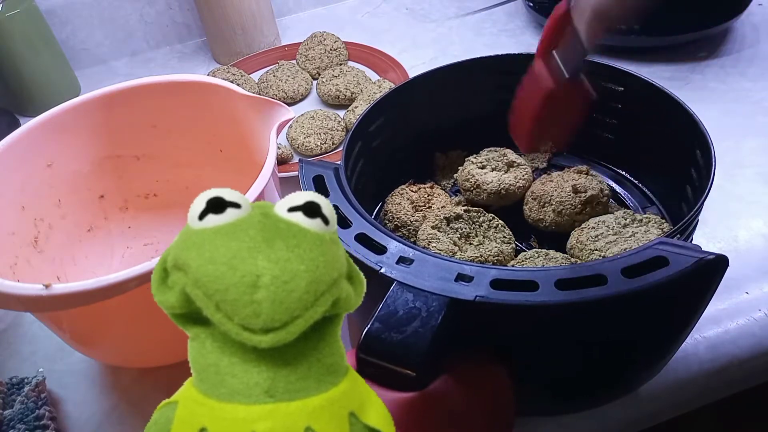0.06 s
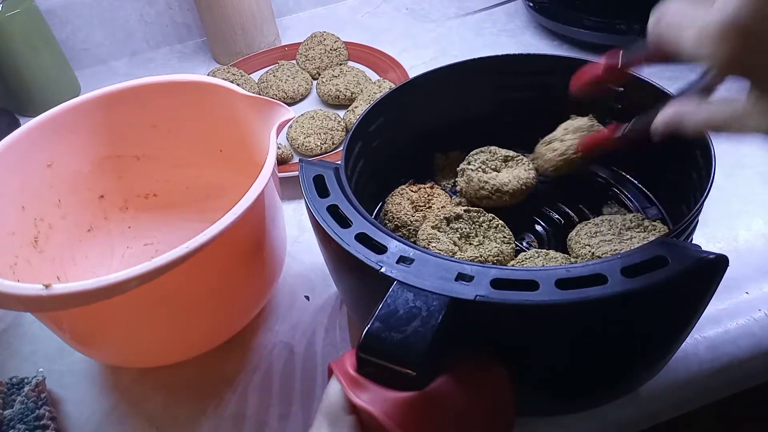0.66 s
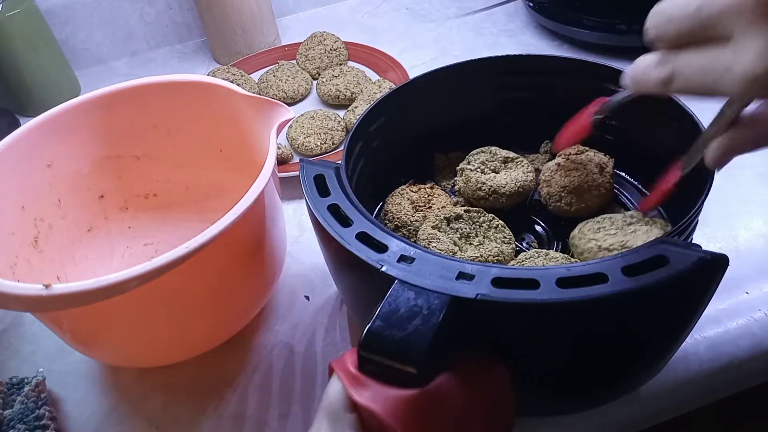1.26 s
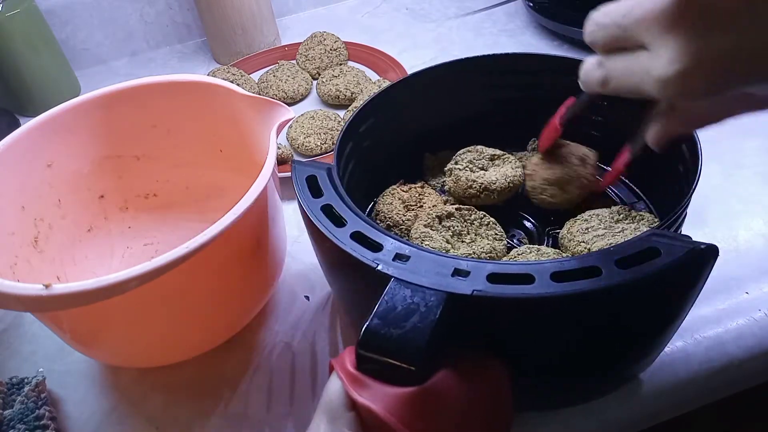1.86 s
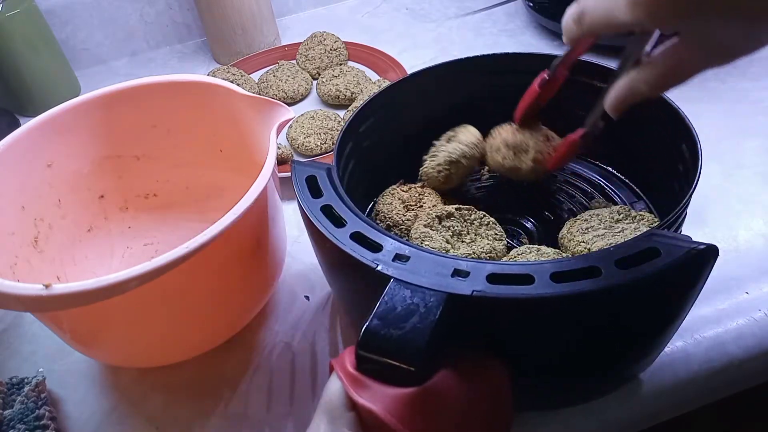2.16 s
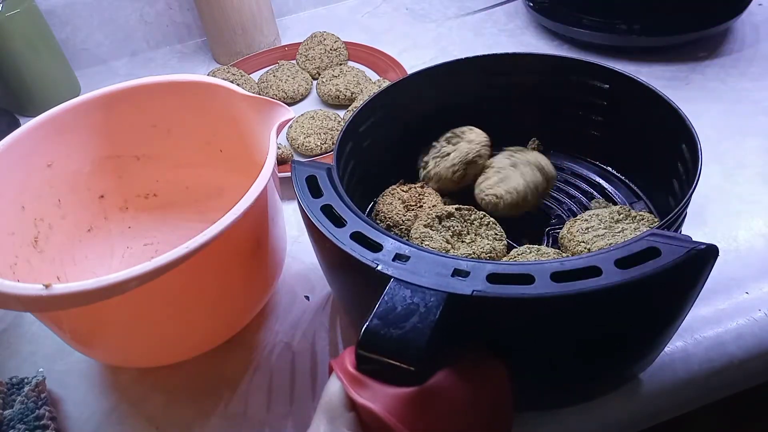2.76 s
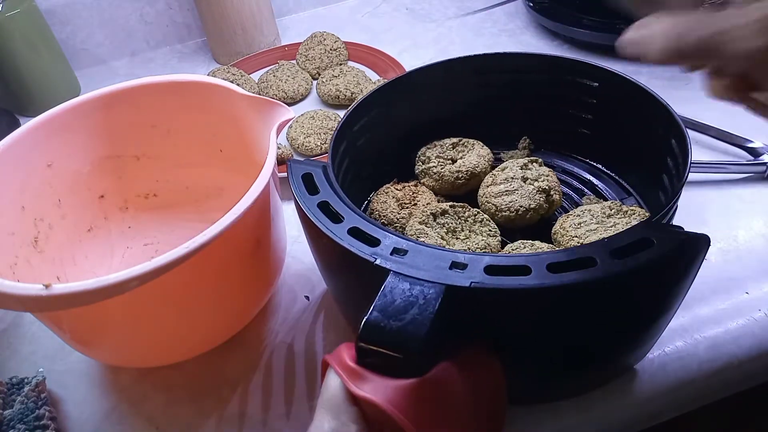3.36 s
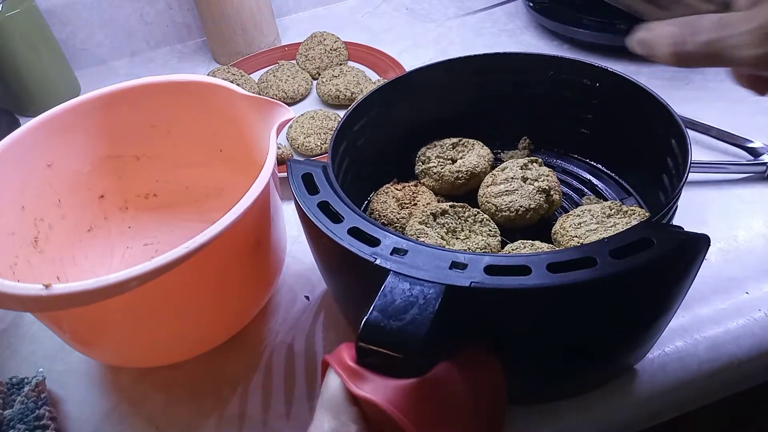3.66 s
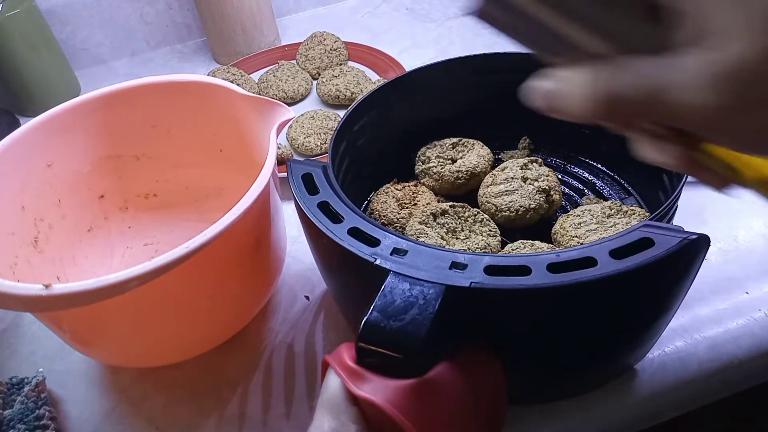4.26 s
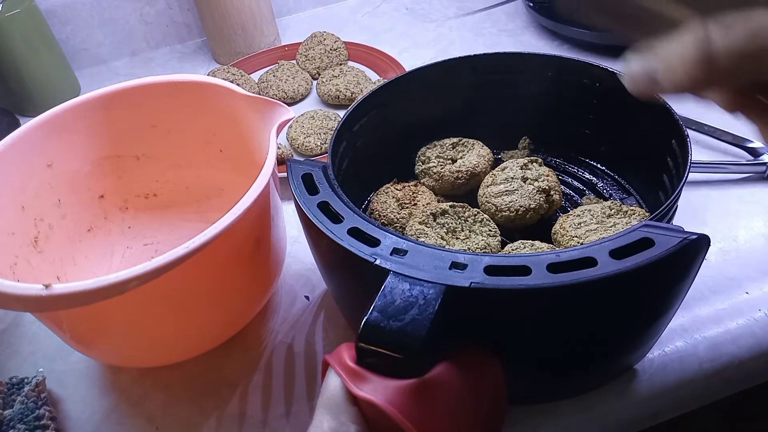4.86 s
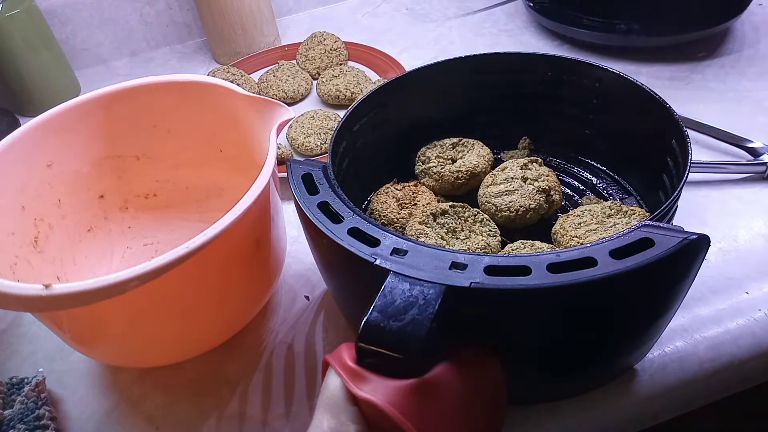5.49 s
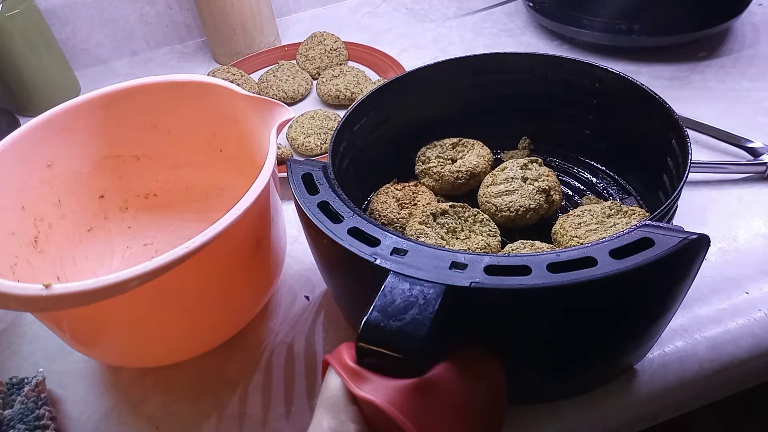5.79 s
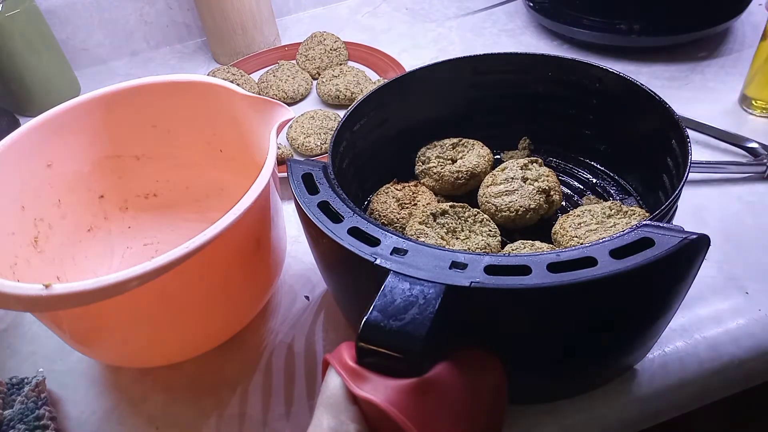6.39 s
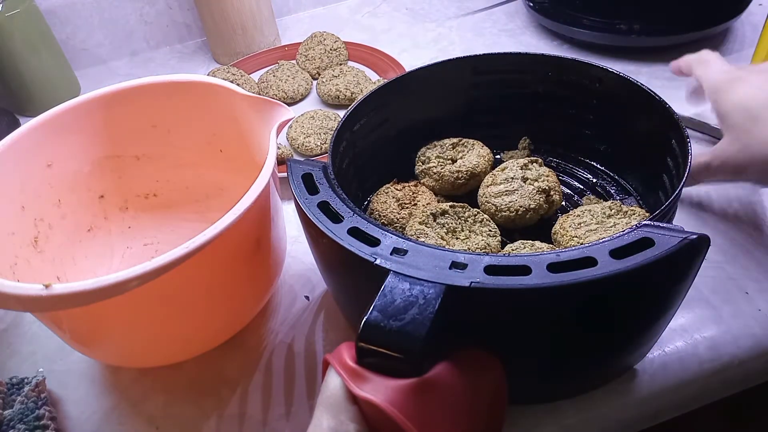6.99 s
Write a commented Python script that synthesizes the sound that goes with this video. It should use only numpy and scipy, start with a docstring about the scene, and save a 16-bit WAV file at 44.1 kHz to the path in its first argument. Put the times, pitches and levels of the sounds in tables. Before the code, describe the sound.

Faint ticks, scrapes and crunches come from patties being turned with tongs in a fryer basket, until the steel tongs clatter and bounce on the counter. Ten quick hissing squirts from a clicking oil pump follow, and the bottle lands with a loud, rattling thump. Everything is heard over a quiet room hiss, at arm's length, through a small microphone in a small kitchen.

```python
"""Light clinks and crunches over a quiet hiss: tongs turn crusty patties in an air fryer basket, then
drop on the counter, steel arms clashing. A hand pump squirts oil over the food, four strokes a second,
hissing through its nozzle, with trigger, piston and valve clicks between squirts. The bottle is set down
hard and drums the counter. A small kitchen, heard at arm's length through a small microphone."""
import sys
import numpy as np
from scipy import signal
from scipy.fft import rfft, irfft, next_fast_len
from scipy.io import wavfile

SR = 44100
rng = np.random.default_rng(int(sys.argv[2]) if len(sys.argv) > 2 else 0)


def generate_wav(sig):
    """Save sig (samples, or channels by samples) to the path in sys.argv[1] as 16-bit PCM at SR."""
    pcm = np.round(np.clip(np.atleast_2d(sig).T, -1, 1) * 32767).astype(np.int16)
    wavfile.write(sys.argv[1], SR, pcm)


N = 310023
EVENT_T = np.arange(16384) / SR  # time axis of one short sound, s

# modes of the counter top: (f/Hz, level/dB, t60/s before damping)
COUNTER_MODES = [(106.5, -11.5, 0.14), (134.4, -9, 0.17), (193, -13.5, 0.24), (223.4, -9.5, 0.29),
                 (291, -6, 0.23), (376.2, 4.5, 0.18), (450, -9, 0.29), (501, 2.5, 0.12), (641, -10.5, 0.24),
                 (714, -10.5, 0.33), (790, -8.5, 0.32), (870.5, -8, 0.34), (978, -10.5, 0.17),
                 (1198, -14, 0.13)]
# what the small plastic pump head can radiate: (f/Hz, level/dB)
PUMP_HEAD = [(300, -59), (560, -4.5), (760, -0.5), (4800, -7.5), (7000, -32), (16000, -26)]
# resonances of the pump's hollow body: (f/Hz, width/Hz, level/dB)
PUMP_CAVITY = [(778, 112, -5), (1013, 108, 1), (1268, 97, 3.5), (2046, 46, -10)]


def amp(db):
    """Gain of a level in dB."""
    return 10 ** (np.asarray(db) / 20)


def unit(x):
    """x at rms 1."""
    return x / np.sqrt(np.mean(x ** 2) + 1e-20)


def along(points, hz):
    """(f/Hz, value) points read on a log frequency axis."""
    f, values = np.transpose(points)
    return np.interp(np.log(hz + 1), np.log(f + 1), values)


def grid(size=len(EVENT_T)):
    """The frequencies of an FFT."""
    return np.fft.rfftfreq(size, 1 / SR)


def colour(points, size=len(EVENT_T)):
    """Causal response with the given (f/Hz, level/dB) spectrum."""
    cepstrum = irfft(np.log(amp(along(points, grid(size)))), size)
    cepstrum[1:size // 2] *= 2
    cepstrum[size // 2 + 1:] = 0
    return np.exp(rfft(cepstrum))


def body(resonances):
    """Causal response of (f/Hz, width/Hz, level/dB) resonances, alternating in sign."""
    f = grid()
    return sum((-1) ** k * amp(db) * 1j * f * width / (hz * hz - f * f + 1j * f * width)
               for k, (hz, width, db) in enumerate(resonances))


def peak(hz, width_hz, db):
    """A response that lifts one narrow resonance above the rest."""
    return 1 + body([(hz, width_hz, db)])


def tube(hz, echo):
    """Sound running up and down a short tube resonates at multiples of hz."""
    return 1 / (1 - echo * np.exp(-2j * np.pi * grid() / hz))


def through(x, response):
    """A short sound passed through a response."""
    return irfft(rfft(x, len(EVENT_T)) * response)


def spread(x, length=.01):
    """x with the energy of rms 1 held for length seconds."""
    return x / np.sqrt(np.sum(x ** 2) / (length * SR) + 1e-20)


def add(track, t, x):
    """Mix x into the track at t seconds."""
    part = track[round(t * SR):][:len(x)]
    part += x[:len(part)]


def burst(response, t60, rise=0.00038):
    """One contact: a quickly dying crack, coloured by what it strikes; soft contacts rise slowly."""
    envelope = amp(-60 * EVENT_T / t60) * (1 - np.exp(-EVENT_T / rise))
    return spread(through(rng.standard_normal(len(EVENT_T)) * envelope, response))


def ring(modes, damping, scatter_db):
    """Modes struck at new strengths; neighbours swing in opposite directions."""
    hz, db, t60 = np.transpose(modes)[:, :, None]
    strength_db = db + scatter_db * rng.standard_normal(hz.shape)
    sign = (-1) ** np.arange(len(hz))[:, None]
    partials = sign * amp(strength_db - 60 * damping * EVENT_T / t60) * np.sin(2 * np.pi * hz * EVENT_T)
    attack = 1 - np.exp(-EVENT_T / .0006)
    return spread(partials.sum(axis=0) * attack)


def grains(per_s, spike_db):
    """Tiny impacts of uneven size at random times."""
    n = len(EVENT_T)
    sizes = amp(spike_db * np.minimum(rng.exponential(size=n), 3)) * rng.choice([-1, 1], n)
    return unit(sizes * (rng.random(n) < per_s / SR))


def stroke(x, response, length, rise, fall):
    """An excitation that swells, lasts for length seconds and dies, through a response."""
    gate = np.clip(EVENT_T / rise, 0, 1) * np.exp(-np.maximum(EVENT_T - length, 0) / fall)
    return spread(through(x * gate, response), max(length, rise))


def noise(points):
    """Steady noise of rms 1 with the given spectrum."""
    size = next_fast_len(N + 8192)
    spectrum = rfft(rng.standard_normal(size)) * amp(along(points, grid(size)))
    return unit(irfft(spectrum, size)[:N])


def room_tone():
    """Quiet room hiss; a faint low rush sets in near the end."""
    # spectra of the hiss and the rush: (f/Hz, level/dB)
    hiss = [(25, -3.5), (60, 0.5), (110, 1.5), (170, 10), (260, -6.5), (450, -0.5), (600, -15.5),
            (800, -5.5), (1000, -12.5), (1500, -10.5), (2000, -15), (7000, -19), (16000, -23)]
    rush = [(150, -11), (330, -10), (460, -0.5), (650, -4), (900, -6), (1300, -24.5), (4000, -33),
            (10000, -35)]
    onset = np.clip((np.arange(N) / SR - 6.78) / 0.015, 0, 1)
    return amp(-66.5) * noise(hiss) + amp(-69) * onset * noise(rush)


def kitchen_echo(x, block=8192, reflections=7):
    """Near walls and the room's tail, drawn anew each block as the hands move; treble dies first."""
    # the room's decay: (f/Hz, t60/s)
    decay = [(120, .42), (500, 0.28), (1200, 0.25), (4000, 0.23), (8000, 0.16), (15000, 0.16)]
    # what the walls give back: (f/Hz, level/dB)
    walls = [(200, -2), (1200, -3.5), (5000, -1.5), (8000, 1.5), (12000, -4.5)]
    out = np.zeros(N)
    for i in range(0, N, block):
        hz, t, bands = signal.stft(rng.standard_normal(len(EVENT_T)), SR, nperseg=256)
        tail_db = along(walls, hz)[:, None] - 60 * t / along(decay, hz)[:, None]
        tail = signal.istft(bands * amp(tail_db), SR)[1] * np.clip(EVENT_T / 0.0026, 0, 1)
        tail /= np.linalg.norm(tail)
        delays = rng.uniform(.001, .009, reflections)  # counter, basket and back wall
        tail[(delays * SR).astype(int)] += amp(-6.5) * rng.choice([-1, 1], reflections)
        add(out, i / SR, signal.fftconvolve(x[i:i + block], tail))
    return out


def in_kitchen(sources):
    """Direct sound and echo of (sound, echo level/dB) pairs."""
    direct = sum(x for x, _ in sources)
    return direct + kitchen_echo(sum(amp(echo_db) * x for x, echo_db in sources))


def food_in_basket():
    """Soft patties thud and ring the basket; their crust crunches on the ribs."""
    # a patty or a tong tip touches the basket: (t/s, thud/dB, basket ring/dB, crunch/dB)
    touches = [(.407, -88, -64.5, -73), (.579, -84, -55, -64.5), (.906, -64, -73, -65),
               (1.22, -79, -62, -75), (1.319, -59, -72, -61), (1.347, -42, -57, -71),
               (1.365, -47, -54, -59.5), (1.453, -50.5, -47, -54), (2.369, -53.5, -54.5, -47.5),
               (2.889, -94, -63.5, -67.5), (3.314, -54, -57.5, -46.5)]
    # food slides over the basket: (start/s, end/s, scrape/dB, patty rumble/dB)
    slides = [(0.618, .715, -66, -80), (0.906, 0.935, -74, -68), (1.33, 1.413, -65, -61),
              (2.371, 2.43, -52, -63), (2.445, 2.554, -66, -90), (2.864, 2.886, -61.5, -77.5),
              (3.325, 3.353, -62, -53.5)]
    # a tong tip rubs along the basket's wall: (start/s, end/s, level/dB)
    rubs = [(1.77, 1.777, -62), (1.884, 2.063, -78.5), (2.076, 2.29, -83)]
    # resonances of patty, basket and basket wall: (f/Hz, width/Hz, level/dB)
    patty_modes = [(215, 83, -6), (295, 110, -5.5), (405, 80, -5)]
    basket_modes = [(630, 58, -6.5), (734, 32, 3.5), (1964, 90, -13.5)]
    wall_modes = [(1600, 130, 6), (3200, 190, -8)]
    # the crust's crunch: (f/Hz, level/dB)
    crust_spectrum = [(400, -40.5), (1200, 4), (1900, 0.5), (3000, 4), (5500, 3), (9000, 2), (16000, -9)]
    out, crust = np.zeros(N), colour(crust_spectrum)
    soft = colour([(700, -7), (2000, -9.5), (5000, -20.5)])
    patty, basket = soft * body(patty_modes), soft * body(basket_modes)
    for t, thud_db, ring_db, crunch_db in touches:
        add(out, t, amp(thud_db - 0.5) * burst(patty, t60=0.047))
        add(out, t, amp(ring_db + 5) * burst(basket, t60=0.032, rise=0.0015))
        add(out, t, amp(crunch_db + 2) * burst(crust, t60=0.11, rise=0.0054))
    for start, end, scrape_db, rumble_db in slides:
        for db, response in ((rumble_db, patty), (scrape_db, basket), (scrape_db + .5, crust)):
            friction = grains(per_s=2500, spike_db=5.5)
            add(out, start, amp(db) * stroke(friction, response, end - start, rise=0.0055, fall=.01))
    wall = body(wall_modes)
    for start, end, db in rubs:
        friction = grains(per_s=780, spike_db=2)
        add(out, start, amp(db) * stroke(friction, wall, end - start, rise=0.0036, fall=0.017))
    return out


def tong_clinks():
    """The tips of the tongs tick lightly against metal."""
    # a tip meets metal: (t/s, level/dB, brightest f/Hz)
    clinks = [(0.412, -60, 2100), (0.577, -54, 1940), (0.668, -52, 3930), (.705, -44, 5760),
              (2.955, -42, 5600), (2.965, -49.5, 3180)]
    # resonances of a tip: (f/Hz, width/Hz, level/dB)
    tip_modes = [(1830, 230, -0.5), (3020, 1500, -8), (4050, 240, -4), (5650, 1300, -7.5),
                 (7310, 640, -1.5), (9480, 1100, -3.5)]
    out, tip = np.zeros(N), body(tip_modes)
    for t, db, hz in clinks:
        add(out, t, amp(db) * burst(tip * peak(hz, width_hz=490, db=11.5), t60=0.055, rise=0.002))
    add(out, .31, amp(-55.5) * burst(body([(15000, 1800, 0)]), t60=.03))  # one thin, very high tick
    return out


def dropped_tongs():
    """The soft tips land first and damp the counter; the steel arms clash in turn, chatter and bounce."""
    # the tongs land and bounce: (t/s, thud/dB, steel/dB)
    bounces = [(2.989, -26, -48.5), (3.009, -28, -17), (3.023, -29.5, -35.5), (3.123, -55, -20.5),
               (3.162, -63, -32.5), (3.178, -42, -39.5), (3.196, -39.5, -41.5)]
    # modes of the steel arms: (f/Hz, level/dB, t60/s before damping)
    steel_modes = [(1920, -6, .13), (2890, -4, .14), (3330, -4, .15), (3750, -3, .14), (4050, -5, .14),
                   (4490, -4, .13), (5510, -3, .13), (5680, -3, .13), (6000, -1, .13), (6350, -1, .15),
                   (7070, -3, .13), (7470, -2, .16), (8060, -2, .12), (8600, -3, .1)]
    # the dull clack on the counter and the bright clash of steel: (f/Hz, level/dB)
    clack_spectrum = [(60, -20.5), (130, -3.5), (260, -2.5), (480, 6), (900, 0), (1400, -5.5), (2100, -5),
                      (3200, -8), (8000, -24.5)]
    clash_spectrum = [(700, -38), (2000, -23), (3000, 7.5), (6500, 4), (9000, 8), (13000, -0.5),
                      (16000, 0.5)]
    out, clack, clash = np.zeros(N), colour(clack_spectrum), colour(clash_spectrum)
    for t, thud_db, steel_db in bounces:
        clack_db = 0.22 * thud_db + 0.78 * steel_db - 2.5
        add(out, t, amp(thud_db) * ring(COUNTER_MODES, damping=3.2, scatter_db=4.5))
        for delay_s, arm_db in ((0, 0), (.0035, -10)):  # the second arm lands more lightly
            steel = amp(1.5) * burst(clash, t60=0.023)
            steel += amp(-9) * ring(steel_modes, damping=2, scatter_db=3)
            arm = amp(clack_db) * burst(clack, t60=0.05) + amp(steel_db) * steel
            add(out, t + delay_s, amp(arm_db) * arm)
    chatter_start_s, rise_s, hold_s = 3.01, .006, 0.066
    for db, fall_db_per_s, response in ((-33, 270, clash), (-29.5, 174, clack)):
        chatter = unit(through(grains(per_s=3000, spike_db=1.5), response))
        level = amp(db - fall_db_per_s * np.maximum(EVENT_T - hold_s, 0))
        add(out, chatter_start_s, np.clip(EVENT_T / rise_s, 0, 1) * level * chatter)
    return out


def bottle_set_down(contacts=4, gap_stretch=1.19):
    """The full bottle clacks down in short rattles that drum the counter, and grinds as it settles."""
    # it lands, then rocks twice: (t/s, counter thud/dB, clack/dB, first rattle gap/s)
    landings = [(6.36, -14, -10, 0.008), (6.428, -21, -24.5, 0.012), (6.492, -36.5, -31, .009)]
    # the knock of its base: (f/Hz, level/dB)
    knock_spectrum = [(30, -15), (60, -12), (110, -10), (400, 1), (950, 0), (1400, -8.5), (2100, -10.5),
                      (4000, -20.5), (7000, -26), (16000, -40.5)]
    out, knock = np.zeros(N), colour(knock_spectrum)
    ringing_base = knock * peak(840, width_hz=210, db=-1)
    for t, thud_db, clack_db, gap in landings:
        for k in range(contacts):  # each contact is weaker, each gap longer
            thud = amp(thud_db + 2 - 2.5 * k) * ring(COUNTER_MODES, damping=1.3, scatter_db=1)
            clack = amp(clack_db - 3.5 - 3.5 * k) * burst(ringing_base, t60=0.097)
            add(out, t + gap * np.sum(gap_stretch ** np.arange(k)), thud + clack)
    grind = stroke(grains(per_s=7100, spike_db=2.5), knock, length=0.1, rise=.002, fall=0.023)
    add(out, landings[0][0], amp(-26) * grind)
    return out


def pump_click(bright_db, snap_hz, knock_db, knock_hz, tick_db, tick_hz):
    """A hollow knock, a snap and a tick; a brighter contact trades knock for tick."""
    # resonances of the plastic's snap: (f/Hz, width/Hz, level/dB)
    snap_modes = [(2176, 175, 1.5), (2670, 860, -4.5), (3615, 530, -0.5)]
    # the high tick: (f/Hz, level/dB)
    tick_spectrum = [(1000, -42), (4000, 1.5), (6400, 6.5), (8000, 5), (10500, 9), (16000, -4.5)]
    knock_hz *= np.exp(rng.normal(0, 0.047))  # pitches vary from click to click
    tick_hz *= np.exp(rng.normal(0, 0.133))
    head = colour(PUMP_HEAD)
    knock = head * body(PUMP_CAVITY) * peak(knock_hz, width_hz=106, db=11)
    snap = head * body(snap_modes) * peak(snap_hz, width_hz=116, db=13)
    tick = colour(tick_spectrum) * tube(knock_hz, echo=0.3) * peak(tick_hz, width_hz=185, db=12)
    return (amp(knock_db - bright_db - 2.5) * burst(knock, t60=0.023, rise=0.0005)
            + amp(-.5) * burst(snap, t60=0.028, rise=0.002)
            + amp(tick_db + bright_db + 3) * burst(tick, t60=0.044, rise=0.00031))


def oil_pump():
    """Oil sputters through the nozzle until the piston bottoms out; the pump clicks as it refills."""
    # the clicks of the pump's cycle: (t/s, level/dB, brightness/dB, snap f/Hz)
    releases = [(3.473, -49.5, 10, 3720), (3.701, -55, 4, 4240), (3.707, -42, 4.5, 3670),
                (3.969, -51.5, 9.5, 3600), (4.22, -47.5, -2.5, 2190), (4.478, -63, 11, 4500),
                (4.734, -46.5, -0.5, 2050), (4.99, -54, -1, 4060), (5.252, -55.5, 1, 2230),
                (5.493, -52, 7.5, 3880), (5.75, -45.5, 2, 2230), (5.986, -52, 9, 2370)]  # the finger lets the trigger go
    returns = [(3.717, -41.5, 5, 2270), (3.979, -39.5, 3.5, 3650), (3.986, -42, -0.5, 3640),
               (4.232, -48, 4.5, 3050), (4.486, -47, 0.5, 2170), (4.496, -48.5, -1.5, 2200),
               (4.744, -42.5, -1.5, 3530), (5.002, -42, -3, 3770), (5.266, -45, 2.5, 2870),
               (5.503, -46.5, -8, 1940), (6.005, -51.5, -0.5, 3110)]  # the piston springs back to its stop
    valves = [(4.028, -38, 6, 3520), (4.267, -68, -14, 2260), (4.534, -45, 1.5, 3140),
              (4.77, -45, 2.5, 3000), (5.036, -46.5, 3, 3500), (5.297, -57.5, -12, 3580),
              (5.554, -39.5, 3, 2710), (5.789, -57.5, -17.5, 3600), (6.049, -75.5, -16.5, 3630)]  # the valve shuts as the chamber fills
    presses = [(3.793, -58, 3, 3480), (4.043, -51.5, 0.5, 3630), (4.292, -64.5, -0.5, 2270),
               (4.554, -52.5, 0, 2520), (4.792, -63.5, 2.5, 2250), (5.061, -52.5, -0.5, 2570),
               (5.308, -55, 2.5, 2320), (5.56, -43.5, 4.5, 2300), (5.8, -53, 2, 2270)]  # the finger takes up the trigger's slack
    # squirts of oil: (start/s, end/s, push/dB, mist/dB, whistle f/Hz, stop click/dB)
    squirts = [(3.522, 3.582, -63, -48, 4400, -44.5), (3.827, 3.88, -55, -50, 3950, -44),
               (4.078, 4.123, -51, -52, 4450, -43.5), (4.337, 4.383, -46.5, -50.5, 3740, -46),
               (4.587, 4.63, -42.5, -42.5, 4380, -42), (4.83, 4.869, -45, -49.5, 4350, -40.5),
               (5.096, 5.134, -37, -39.5, 3610, -38.5), (5.342, 5.375, -38.5, -41, 4510, -40),
               (5.595, 5.641, -37.5, -39, 3630, -43), (5.832, 5.863, -51, -52, 3720, -47.5)]
    # resonances of the nozzle and of the bottle, which rings on: (f/Hz, width/Hz, level/dB)
    nozzle_modes = [(2180, 370, -10), (3300, 750, -8.5), (3966, 234, 5), (4700, 210, 1)]
    bottle_modes = [(1040, 14, -6.5), (1190, 12, 1), (2200, 17, -8)]
    # the hiss of the mist: (f/Hz, level/dB)
    mist_spectrum = [(600, -27.5), (1500, -16), (3000, -5), (5500, 3), (7500, 2.5), (10000, 1.5),
                     (16000, 2)]
    out, head = np.zeros(N), colour(PUMP_HEAD)
    cavity, nozzle = head * body(PUMP_CAVITY), head * body(nozzle_modes)
    mist = colour(mist_spectrum) * tube(1230, echo=0.067)
    for clicks, voice in ((releases, dict(knock_db=2, knock_hz=1244, tick_db=-2, tick_hz=6283)),
                          (returns, dict(knock_db=5, knock_hz=1070, tick_db=-2.5, tick_hz=5259)),
                          (valves, dict(knock_db=2, knock_hz=908, tick_db=-18.5, tick_hz=5400)),
                          (presses, dict(knock_db=9.1, knock_hz=934, tick_db=9.6, tick_hz=10600))):
        for t, db, bright_db, snap_hz in clicks:
            add(out, t, amp(db) * pump_click(bright_db, snap_hz, **voice))
    for start, end, push_db, mist_db, whistle_hz, stop_db in squirts:
        whistle = nozzle * peak(whistle_hz, width_hz=110, db=6.5)
        for db, response in ((push_db, cavity), (push_db + 0.5, whistle), (mist_db + 6, mist)):
            sputter = grains(per_s=6000, spike_db=3)
            # pressure builds and drains in the nozzle
            add(out, start, amp(db) * stroke(sputter, response, end - start, rise=0.02, fall=0.0085))
        stop = pump_click(bright_db=0, snap_hz=1930, knock_db=0.5, knock_hz=1100, tick_db=0, tick_hz=5685)
        add(out, end, amp(stop_db) * stop)
    return out + signal.fftconvolve(out, irfft(body(bottle_modes)))[:N]


def scene():
    """One counter, an arm's length from the microphone: first the turning, then the oiling."""
    turning = in_kitchen([(food_in_basket(), -8), (tong_clinks(), -12), (dropped_tongs(), -10)])
    oiling = in_kitchen([(oil_pump(), -11.5), (bottle_set_down(), -11)])
    turning *= np.clip((3.362 - np.arange(N) / SR) / .002, 0, 1)  # it stops short, echo and all
    return (turning + oiling + room_tone())[None]


def record(dry):
    """A small mono microphone with a dip in the top octave and a steep band limit."""
    # the microphone's response: (f/Hz, level/dB)
    microphone = [(20, -29), (40, -5.5), (90, -1), (7400, 0.5), (8600, -9), (10000, -13), (13300, -14),
                  (15000, -5), (16000, -8)]
    size, top_hz = 2 * next_fast_len(N // 2 + 8192), 16000
    band_limit = 1 / np.sqrt(1 + (grid(size) / top_hz) ** 240)
    return irfft(rfft(dry, size) * colour(microphone, size) * band_limit, size)[:, :N]


dry = scene()
out = record(dry)
generate_wav(out)
```